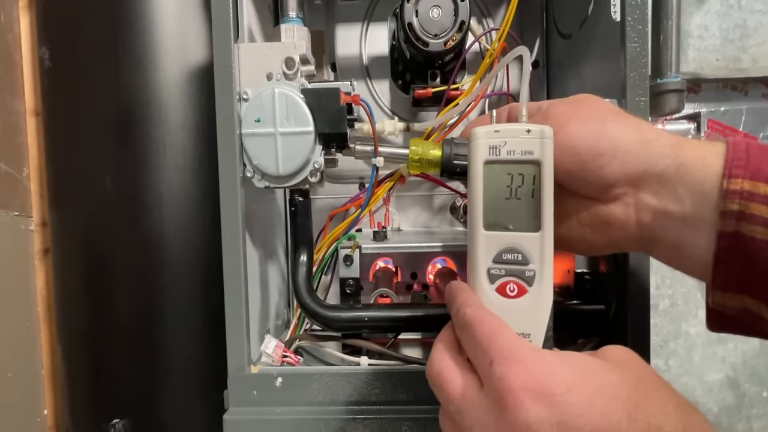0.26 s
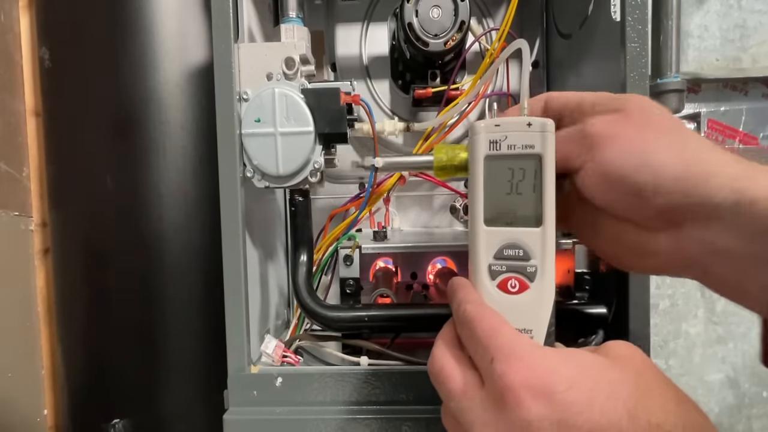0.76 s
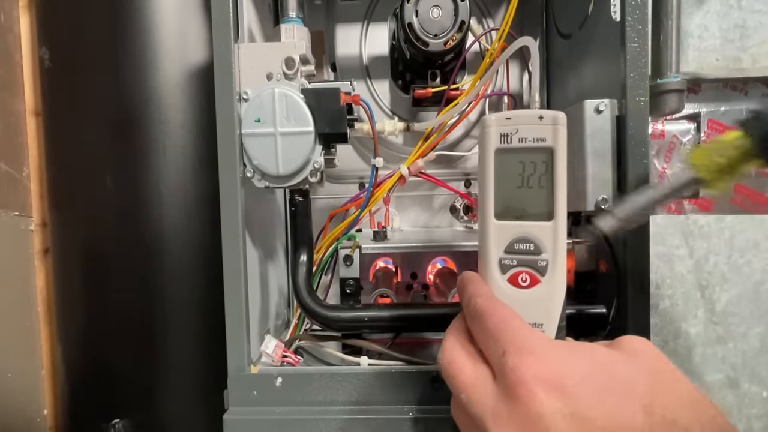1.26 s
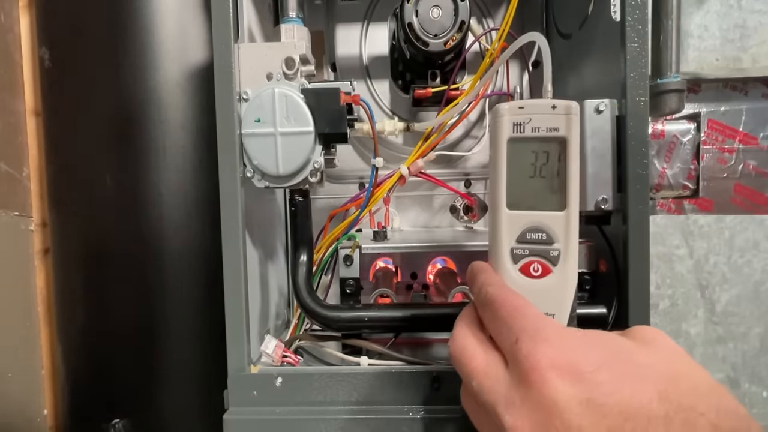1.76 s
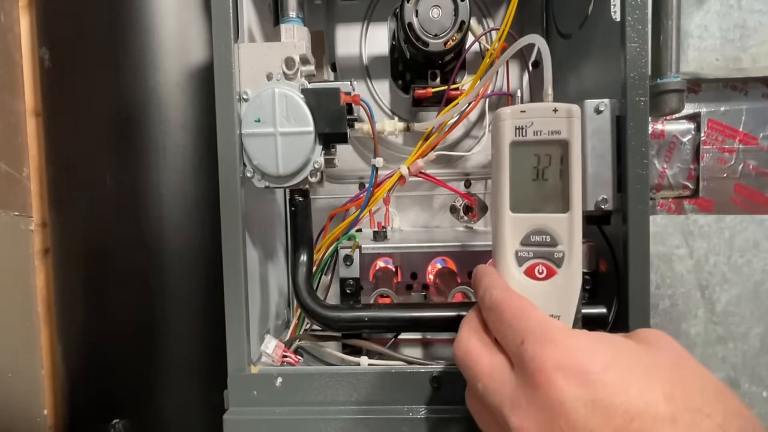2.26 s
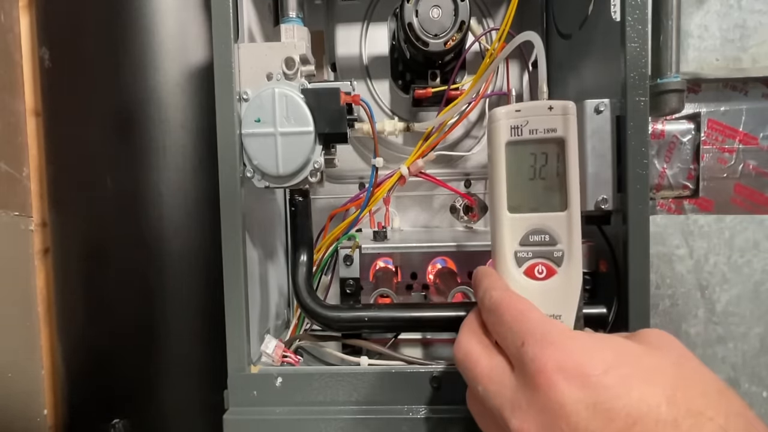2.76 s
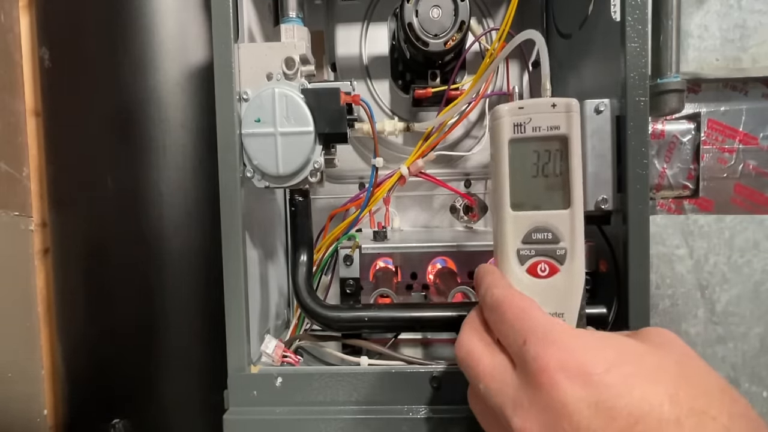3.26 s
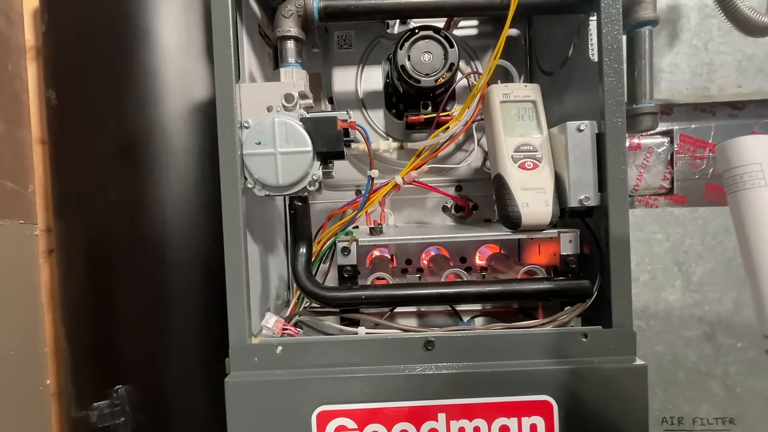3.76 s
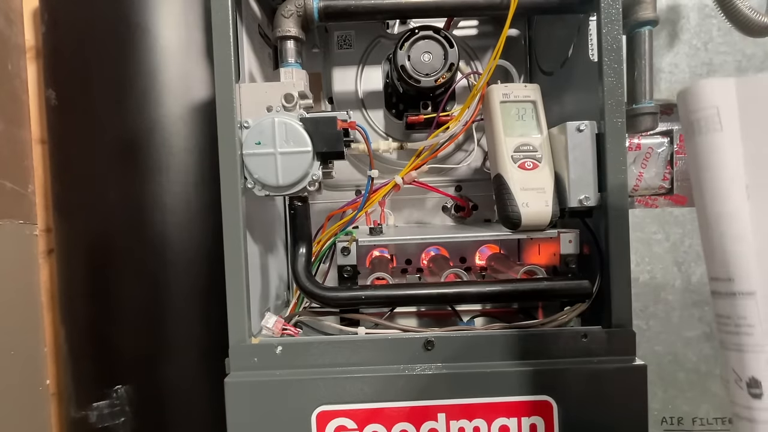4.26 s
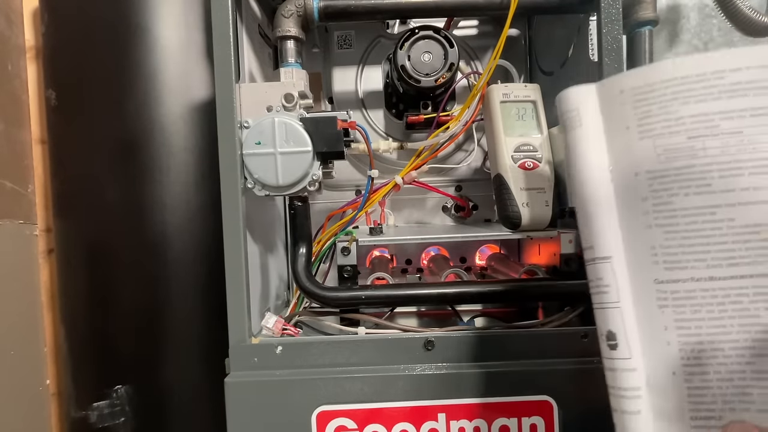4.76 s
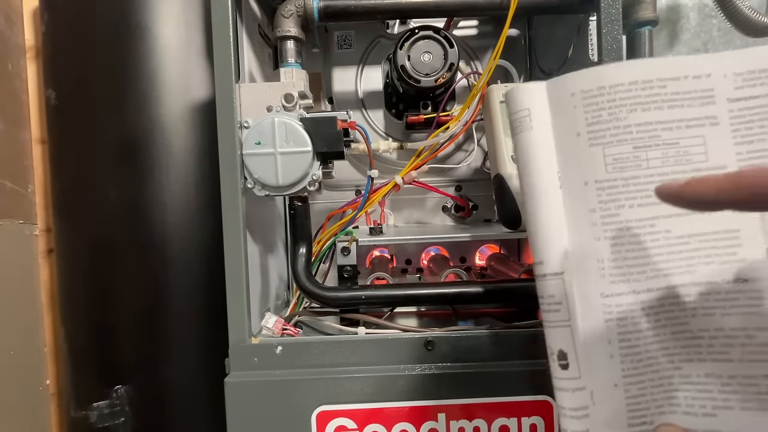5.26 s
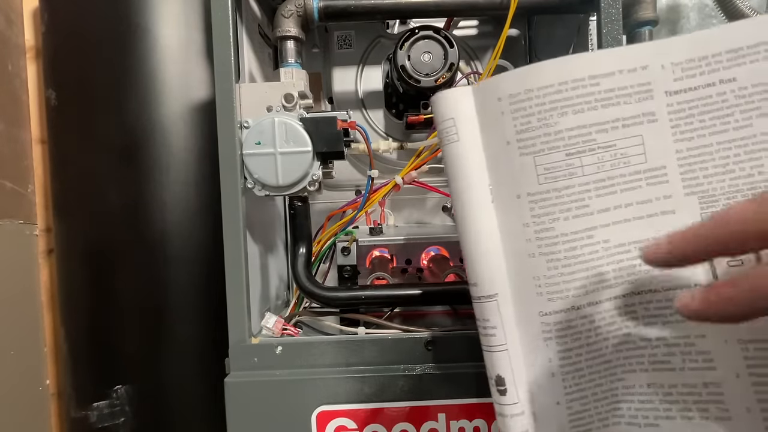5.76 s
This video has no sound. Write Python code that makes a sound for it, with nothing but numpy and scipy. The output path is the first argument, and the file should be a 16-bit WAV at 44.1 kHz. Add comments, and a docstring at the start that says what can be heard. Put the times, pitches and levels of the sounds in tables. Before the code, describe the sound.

An open gas furnace runs in a small room, heard close up in stereo. The flames rumble under a low, wavering drone, while a fan pushes air and the gas jets give a high hiss with an occasional faint whistle. About halfway through, everything abruptly becomes louder. Toward the end the fan and hiss dull a little and take on a faintly hollow tone as a paper booklet screens them.

```python
"""Gas furnace, front panel off

Close up in a small room, a stereo pair at one spot, then abruptly at a louder one nearer the jets.
The flames rumble and make their tubes drone, the draft fan pushes air, gas hisses from the jets
and now and then whistles; all of it rings the cabinet and the room. At the second spot a paper
booklet nears from the right, throwing sound back and screening the fan, at last the jets too."""
import sys
import numpy as np
from scipy import signal
from scipy.fft import rfft, irfft
from scipy.io import wavfile
from scipy.ndimage import uniform_filter1d

SR = 44100
rng = np.random.default_rng(int(sys.argv[2]) if len(sys.argv) > 2 else 0)


def unload_audio(sound):
    """Save the sound as a 16-bit wav file, at the path given as the first command line argument."""
    columns = np.transpose(np.atleast_2d(sound))
    # keep every value between -1 and 1, then stretch to whole-number steps
    steps = np.round(np.clip(columns, -1, 1) * 32767)
    wavfile.write(sys.argv[1], SR, steps.astype(np.int16))


N = 264600

MOVE_S = 3.329  # the first spot gives way to the second
CENTRED_HZ = 8530  # above this both microphones get the same level
SIDES = np.array([[.5], [-.5]])  # splits a left-minus-right amount between the channels


def flames(rumble_db, roar_db, response, split_hz=175):
    """Turbulent burning: the deep rumble surges, the roar above it only swells slowly."""
    # What the flames radiate. Each row: frequency in Hz, relative level in dB.
    flame_spectrum = [(20, -13), (32, -27), (50, -6.5), (62, -1.5), (90, -0.5), (150, -2.5), (230, -13),
                      (400, -17), (650, -23.5), (1200, -57)]
    burning = turbulence(flame_spectrum, response)
    rumble = below(burning, split_hz)
    roar = (burning - rumble) / rumble.mean(0).std()  # scaled against the rumble
    surge_db, swell_db = 0.56 * wander(per_s=8.5), 0.5 * wander(per_s=0.47)
    return gain_of(rumble_db + surge_db) * steady(rumble, size=3500) + gain_of(roar_db + swell_db) * roar


def drone(notes, start_s):
    """Low humming notes that waver and fade, with brief irregular rises and dips at set times."""
    # Rises and dips in loudness at set times.
    # Each row: middle and half length in seconds, rough pitch in Hz, lift in dB.
    timed_lifts = [(0.013, 0.053, 94, 4), (0.225, 0.084, 283, 9.5), (0.703, 0.16, 94, 6),
                   (1.2, 0.29, 283, -5), (1.807, 0.062, 283, 8), (2.2, 0.21, 283, -7),
                   (2.233, 0.051, 196, 11), (2.514, 0.17, 94, 11.5), (3.876, 0.15, 283, 2),
                   (4.223, 0.063, 94, 11), (4.4, 0.67, 196, 4), (4.626, 0.023, 283, 8),
                   (5.315, 0.032, 196, 8.5), (5.376, 0.1, 283, 6), (5.72, 0.05, 94, 8.5),
                   (5.8, 0.073, 196, -13), (5.98, 0.06, 196, 6)]
    since_s, out = seconds_since(start_s), 0
    for hz, db, pan_db, width_hz, fade_db_per_s in notes:
        timed_db = sum(lift_db * hump(middle_s, half_s)
                       for middle_s, half_s, near_hz, lift_db in timed_lifts
                       if abs(near_hz - hz) < hz / 10)
        level_db = db - fade_db_per_s * since_s + timed_db + wander(per_s=2.6)
        out = out + flow_tone(hz, level_db, pan_db, width_hz, saturation=0.75)
    return out


def draft_fan(level_db, response, shade_db_per_s=1.46):
    """Air rushes through the fan housing and flue; the booklet screens it more and more."""
    # What the fan radiates. Each row: frequency in Hz, relative level in dB.
    fan_spectrum = [(250, -42), (500, -7), (950, 2), (1400, -6.5), (2000, -8.5), (2800, -16), (4200, -26),
                    (7000, -31.5)]
    shade_db = shade_db_per_s * seconds_since(MOVE_S)
    pan_db = 3.5 * hump(middle_s=4.5, half_s=0.88)  # tips left as the booklet passes the right microphone
    flutter_db = 0.82 * wander(per_s=35)
    rush = steady(turbulence(fan_spectrum, response))
    return gain_of(level_db + flutter_db - shade_db) * swing(rush, pan_db)


def gas_jets(level_db, response, flutter_db=0.5, cover_s=5.23, shade_db_per_s=3):
    """Gas hisses from the orifices, fluttering slightly, and fades once the booklet covers them."""
    # What the jets radiate. Each row: frequency in Hz, relative level in dB.
    jet_spectrum = [(1500, -13.5), (3000, -4), (4000, -14.5), (6400, -11), (7300, -16.5), (8800, -14.5),
                    (9600, 1.9), (10600, 2), (11550, 2.6), (11950, -3), (12250, -5.5), (13500, -35)]
    shade_db = shade_db_per_s * seconds_since(cover_s)
    flutter = smooth(rng.standard_normal(N), size=700)
    hiss = steady(turbulence(jet_spectrum, response))
    return gain_of(level_db - shade_db + flutter_db * flutter / flutter.std()) * hiss


def whistle():
    """A breathy edge tone of the gas stream at one orifice swells and fades."""
    # Spells of whistling. Each row: middle and half length in seconds, level in dB.
    spells = [(.13, 0.34, -66.5), (0.82, .18, -66), (4.15, 0.81, -64.5)]
    envelope = sum(gain_of(db) * hump(middle_s, half_s) for middle_s, half_s, db in spells)
    return envelope * flow_tone(hz=5980, level_db=0, pan_db=3, width_hz=210, saturation=0.21)


def booklet_echo(x, extra_path_m=0.36, approach_s=1.98, reflected=0.15, low_hz=380, high_hz=2400):
    """The nearing pages throw the midrange at the right microphone: a hollow that sweeps upward."""
    t = clock()
    delay_s = extra_path_m / 343 * np.exp(-(t - MOVE_S) / approach_s)  # sound travels 343 m/s
    midrange = below(x[1], high_hz) - below(x[1], low_hz)
    echo = reflected * (t > MOVE_S) * np.interp(t - delay_s, t, midrange)
    return np.array([x[0], x[1] + echo])


def gap_ring():
    """The changing gap between booklet and cabinet rings with faint hollow tones, some sinking."""
    # Moments of ringing. Each row: middle and half length in seconds, pitch in Hz, glide in Hz per
    # second, level in dB, left minus right in dB, width in Hz.
    rings = [(4.198, 0.43, 2840, -150, -66.5, -5, 70), (4.9, 0.14, 1243, -100, -55, 0, 35),
             (5.099, 0.5, 2606, -110, -65.5, 1, 55.3), (5.48, 0.12, 406.5, 0.5, -45.5, -3, 30),
             (5.6, 0.17, 2270, -150, -64, 0, 45), (5.703, 0.61, 926, -0.5, -65, 10, 40),
             (5.85, 0.55, 1413, 0.5, -62, 11, 50), (5.97, 0.12, 400.5, 0, -51, -3, 30)]
    out = 0
    for middle_s, half_s, hz, glide, db, pan_db, width_hz in rings:
        pitch_hz = hz + glide * (clock() - middle_s)
        out = out + hump(middle_s, half_s) * flow_tone(pitch_hz, db, pan_db, width_hz, saturation=0.13)
    return out


def spot_response(modes, lead, coherence, ripple_db=1.5):
    """Cabinet and room at one spot: gain and phase at each microphone, and how alike the two are."""
    # Stereo balance at both spots. Each row: frequency in Hz, left minus right in dB.
    balance = [(30, .5), (150, 1.5), (300, -5.9), (600, -.5), (1200, 1), (2200, 1.5), (3500, 3), (5000, 6),
               (7000, 5), (8300, 4)]
    # Likeness of the channels in the treble. Each row: frequency in Hz, coherence from 0 to 1.
    treble_coherence = [(2600, .78), (3200, .6), (3900, .3), (5400, .35), (5950, .68), (7200, .3),
                        (8300, .38), (8700, .8), (9750, 1), (10450, 1), (11100, .9), (12000, .99)]
    # Treble phase. Each row: frequency in Hz, left's lead in radians.
    treble_lead = [(2150, 1.6), (3300, 2.3), (4200, .4), (4800, -2.6), (5400, -2.4), (6100, .1), (6600, .8),
                   (7100, -.2), (7850, .1), (8270, 2.0), (8610, .8), (9300, -2.1), (9750, -3.14),
                   (10400, -3.14), (11370, -5.1), (12000, -6.28)]
    hz = np.fft.rfftfreq(N, 1 / SR)
    centre_hz, width_hz, lift_db, pan_db = np.transpose(modes)
    peaks = np.exp(-((hz[:, None] - centre_hz) / width_hz) ** 2)
    apart = np.clip((CENTRED_HZ - hz) / 300 + .5, 0, 1)
    level_db = peaks @ lift_db + SIDES * apart * (curve_at(balance, hz) + peaks @ pan_db)
    # above the lowest modes, overlapping reflections comb the sound finely
    comb = smooth(rng.standard_normal((2, len(hz))), size=130)
    level_db += ripple_db * apart * comb / comb.std() * hz ** 2 / (hz ** 2 + 600 ** 2)
    phase = SIDES * curve_at(lead + treble_lead, hz)
    return gain_of(level_db) * np.exp(1j * phase), curve_at(coherence + treble_coherence, hz)


def band_swells(x, spells):
    """Bands of the sound brighten and dull at set times in each channel."""
    out = x
    for middle_s, half_s, left_db, right_db, low_hz, high_hz in spells:
        lift_db = np.array([[left_db], [right_db]]) * hump(middle_s, half_s)
        band = below(x, high_hz) - below(x, low_hz)
        out = out + (gain_of(lift_db) - 1) * band
    return out


def turbulence(spectrum, response):
    """Flow noise, partly shared by the two microphones, coloured by the spot."""
    hz = np.fft.rfftfreq(N, 1 / SR)
    colour, coherence = response
    left, other = rfft(rng.standard_normal((2, N)))
    pair = np.array([left, coherence * left + np.sqrt(1 - coherence ** 2) * other])
    low_hz, high_hz = spectrum[0][0], spectrum[-1][0]
    skirts = 1 / (1 + (hz / high_hz) ** 8) / (1 + (low_hz / (hz + 1)) ** 4)
    return irfft(pair * colour * skirts * gain_of(curve_at(spectrum, hz)), N)


def flow_tone(hz, level_db, pan_db, width_hz, saturation):
    """One mode kept ringing by the flow: its phase wanders, and saturation (0-1) limits its swing."""
    offset_hz = np.fft.fftfreq(N, 1 / SR)
    kicks = rng.standard_normal(N) + 1j * rng.standard_normal(N)
    ring = np.fft.ifft(kicks / (1 + (offset_hz / width_hz) ** 2) ** 2)
    ring = ring / ring.std()
    ring = ring / (0.09 + abs(ring) ** 2) ** (saturation / 2)
    phase = 2 * np.pi * np.cumsum(hz * np.ones(N)) / SR
    tone = (ring * np.exp(1j * phase)).real
    return gain_of(level_db + SIDES * pan_db) * tone / tone.std()


def swing(x, pan_db):
    """Pans a sound about its usual place; the highest treble stays centred."""
    low = below(x, CENTRED_HZ)
    return x - low + low * gain_of(SIDES * pan_db)


def below(x, top_hz):
    """A steep low-pass without delay."""
    hz = np.fft.rfftfreq(N, 1 / SR)
    return irfft(rfft(x) / (1 + (hz / top_hz) ** 20), N)


def steady(x, size=5000):
    """Holds the mean of the channels at level 1, leaving its fast grain."""
    return x / np.sqrt(smooth(x.mean(0) ** 2, size))


def smooth(x, size):
    """A running mean over size samples, taken twice."""
    return uniform_filter1d(uniform_filter1d(x, size), size)


def wander(per_s):
    """Random drift with a spread of 1, up to the given rate."""
    drift = below(rng.standard_normal(N), per_s)
    return (drift - drift.mean()) / drift.std()


def hump(middle_s, half_s):
    """A smooth rise to 1 and fall."""
    return np.exp(-((clock() - middle_s) / half_s) ** 2)


def curve_at(points, hz):
    """Joins points on a log-frequency axis."""
    point_hz, value = np.transpose(points)
    return np.interp(np.log(hz + 1), np.log(point_hz + 1), value)


def gain_of(db):
    """Decibels to a factor."""
    return 10 ** (np.asarray(db) / 20)


def clock():
    """Time in seconds, one value a sample."""
    return np.arange(N) / SR


def seconds_since(start_s):
    """Time since an instant, zero before it."""
    return np.maximum(clock() - start_s, 0)


def furnace(modes, lead, coherence, levels, notes, start_s):
    """Burners, fan and jets as heard from one spot."""
    rumble_db, roar_db, fan_db, jets_db = levels
    response = spot_response(modes, lead, coherence)
    burners = flames(rumble_db, roar_db, response) + drone(notes, start_s)
    return burners + draft_fan(fan_db, response) + gas_jets(jets_db, response)


def scene(crossfade_s=0.0031):
    """The microphones at the first spot, then abruptly at the second, where the booklet nears."""
    # Cabinet and room resonances at each spot.
    # Each row: centre and half width in Hz, lift in dB, left minus right in dB.
    first_modes = [(101.6, 11.7, 4, 0), (167.2, 5.5, 7.5, 2), (199, 12.3, 7, -18), (275.4, 41.4, 16.5, 1),
                   (339.4, 21.6, 9, -6), (383, 37.3, 17, 3), (462.5, 23.7, 15, 8), (528, 32.6, 4.5, 14),
                   (558.5, 28.7, 10, -4.5), (598, 16, 2.5, -11.5), (635, 8.9, 6, 9), (720, 22, 1, 2),
                   (804, 9.8, 8, 6), (892, 18, 9, 3), (978, 38, 4.5, -3.5), (1084, 70, 2.5, -3),
                   (1211, 24, 5, 4), (1285, 32, 4.5, 2), (1405, 18, 2, 2), (1530, 33, 4.5, 2),
                   (1600, 24, 1, 8), (1674, 29, 9.5, 5.5), (1790, 27, 4.5, -1), (1885, 33, 7.5, 2),
                   (2137, 23, 2.5, 7), (2206, 28, 5, -1), (2300, 56, 5, -1), (2535, 50, 9.5, 1.5),
                   (2760, 65, 5, -2), (3290, 97, 7, 1.5), (3620, 97, 3, 4), (4250, 250, 4.0, -1),
                   (4770, 430, 7.5, -3), (5900, 285, 12.5, 1.8), (6740, 310, 6.5, 3.0), (7730, 450, 10, 2),
                   (8460, 250, 7, 1.3), (9050, 620, 3, 0.1)]
    second_modes = [(99, 41, 4.8, -0.5), (171, 5.3, 2.9, 5), (207.4, 8.5, 7.9, -2), (282.3, 52, 14.6, 2.5),
                    (359, 14, 4, -11.5), (394.2, 30, 16.4, 8), (462, 25.6, 6.3, 17), (499, 33.4, 11.3, 0.5),
                    (554, 29.4, 7.7, 11), (616, 43, 9.8, -5.5), (729, 28, 7.6, -3), (822, 34, 8.9, -1),
                    (929, 16, 7.5, 5), (1010, 52, 6.1, -1), (1100, 25, 3.5, -7), (1185, 57, 6.2, 7),
                    (1295, 77, 7.5, 0.5), (1473, 46, 9, -6.5), (1574, 43, 11.6, 0.5), (1654, 40, 11, 0.5),
                    (1771, 33, 11.8, -5), (1883, 28, 7.5, -8), (1965, 66, 6, -3), (2080, 44, 4.3, 0),
                    (2250, 90, 9.5, -3.5), (2583, 70, 7.4, -2), (2750, 93, 5.2, -2.5), (3000, 63, 2.1, 0.5),
                    (3400, 170, 1.4, 5), (4430, 290, 7.2, -2.5), (4730, 106, 5.9, 4), (5100, 280, 4, 1.5),
                    (5995, 330, 8.6, 2.5), (6880, 270, 4.8, 1.5), (7800, 350, 9.7, 2), (8480, 260, 7.5, 3),
                    (9200, 700, 1.4, -1)]
    # Phase of the standing waves. Each row: frequency in Hz, left's lead in radians.
    first_lead = [(140, -.1), (185, -.5), (220, .2), (305, 0), (345, 1.2), (400, 1.2), (480, 3), (505, .3),
                  (580, 2.9), (625, 1), (680, 1), (740, -.5), (950, -.3), (1100, .2), (1190, 1.8),
                  (1260, -.3), (1460, -1.7), (1520, .4), (1850, .2), (2030, -1.7), (2070, 2.1)]
    second_lead = [(140, -.1), (185, -.4), (220, .3), (305, .1), (345, 1.6), (400, 1.6), (455, 2.6),
                   (475, -2.4), (570, 2.4), (635, .4), (680, 1.3), (760, .7), (880, 1.5), (1030, .2),
                   (1130, -1.7), (1320, -1.1), (1450, .2), (1980, .3)]
    # Likeness of the channels below the treble. Each row: frequency in Hz, coherence from 0 to 1.
    first_coherence = [(30, .88), (60, .98), (110, .998), (290, .995), (450, .93), (500, .7), (560, .88),
                       (690, .6), (790, .96), (900, .97), (1020, .65), (1250, .5), (1400, .6), (1510, .3),
                       (1680, .7), (1880, .82), (2030, .4)]
    second_coherence = [(30, .88), (60, .99), (110, .998), (290, .99), (390, .94), (460, .7), (600, .4),
                        (660, .8), (800, .82), (920, .25), (1080, .3), (1220, .66), (1350, .25),
                        (1780, .68), (2100, .42), (2420, .55)]
    # The mix, one row a spot. Each row: gains of rumble, roar, fan and jets in dB.
    levels = [(-43, -44, -47.5, -59), (-38, -38, -44, -53)]
    # Burner tube notes, one list a spot. Each row: pitch in Hz, level in dB, left minus right in dB,
    # width in Hz, fading in dB per second.
    notes = [
        [(94.75, -48.5, 2, 9.9, 1.5), (194.3, -50, -7, 8.1, 0), (280, -48, -3, 11.8, -0.5),
         (379.4, -48, -10.5, 21, 3)],
        [(93.75, -44, 2, 8.8, 0.7), (198.7, -44.5, -8, 9.7, 0.4), (287.5, -42.5, -5, 12.8, 1.1)],
    ]
    # Passing brightness and dullness. Each row: middle and half length in seconds, left and right
    # lift in dB, lower and upper band edge in Hz.
    spells = [(0.6, .25, -4.5, 3, 440, 520), (2.95, .35, 5, 4, 440, 520), (3.412, 0.2, -3, 3.5, 1480, 2230),
              (3.48, 0.15, 4, 5.5, 900, 1100), (3.55, 0.22, -9, -15, 2290, 2640),
              (3.42, .15, 1, -11, 4360, 6460), (4.151, 0.69, 1.5, 3, 3500, 7450),
              (4.75, 0.22, -1.5, -6, 1400, 1800), (5.0, 0.4, -1, 2, 740, 875),
              (5.7, 0.54, 2.5, 1.5, 560, 800), (5.85, 0.34, 0, -6, 1600, 2000),
              (5.9, 0.47, -0.5, 4, 1120, 1350), (5.9, .45, 0, -3.5, 2590, 7000)]
    first = furnace(first_modes, first_lead, first_coherence, levels[0], notes[0], start_s=0)
    second = furnace(second_modes, second_lead, second_coherence, levels[1], notes[1], start_s=MOVE_S)
    first = band_swells(first, [row for row in spells if row[0] < MOVE_S])
    second = band_swells(second, [row for row in spells if row[0] >= MOVE_S])
    share = np.clip((clock() - MOVE_S) / crossfade_s + .5, 0, 1)
    both = np.sqrt(1 - share) * first + np.sqrt(share) * second
    return booklet_echo(both) + whistle() + gap_ring()


def record(dry):
    """The recorder cuts off the treble above 13.1 kHz."""
    low_pass = signal.firwin(511, 13100, window=("kaiser", 9), fs=SR)
    return signal.oaconvolve(dry, low_pass[None], "same")


dry = scene()
out = record(dry)
unload_audio(out)
```